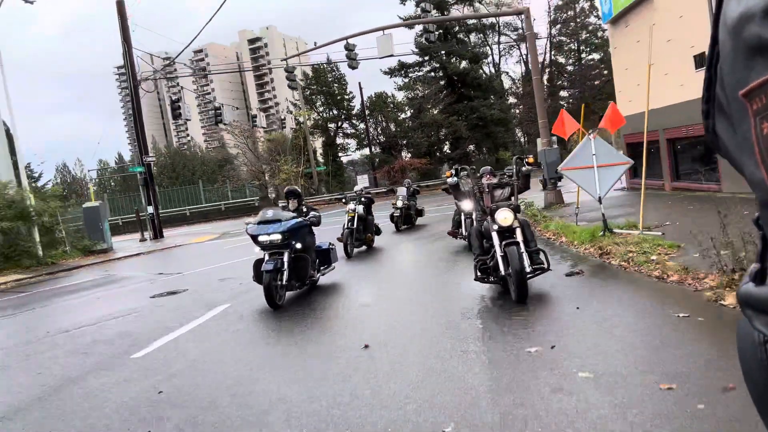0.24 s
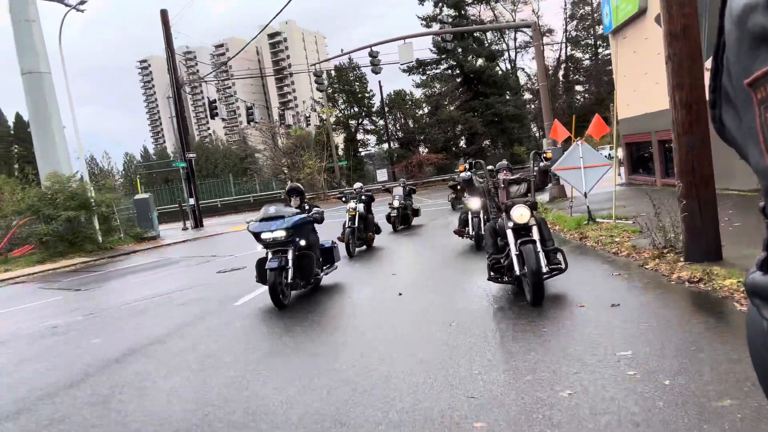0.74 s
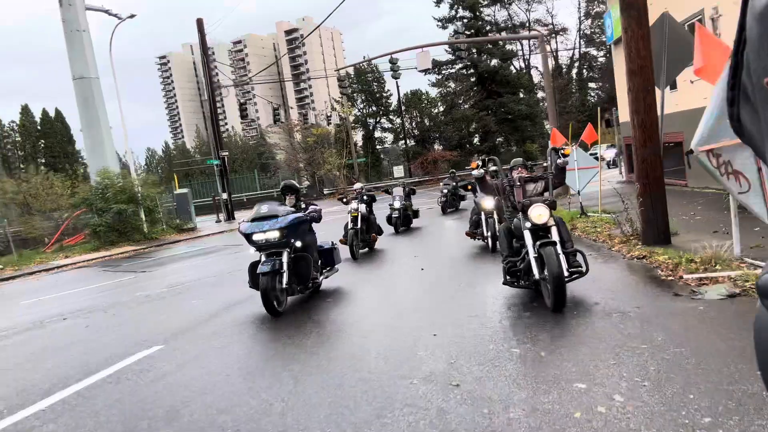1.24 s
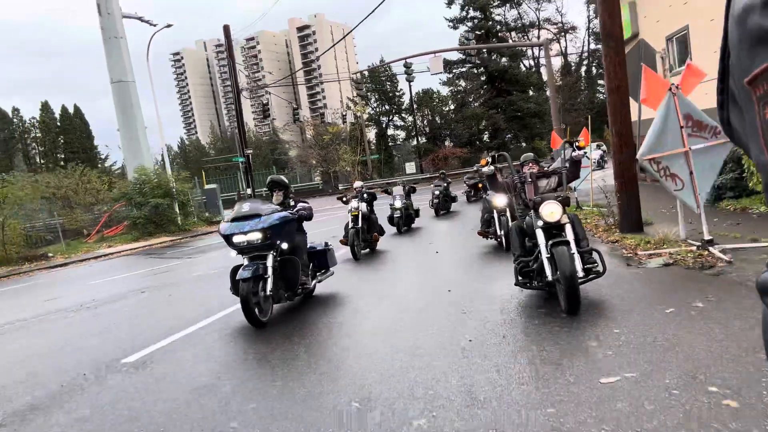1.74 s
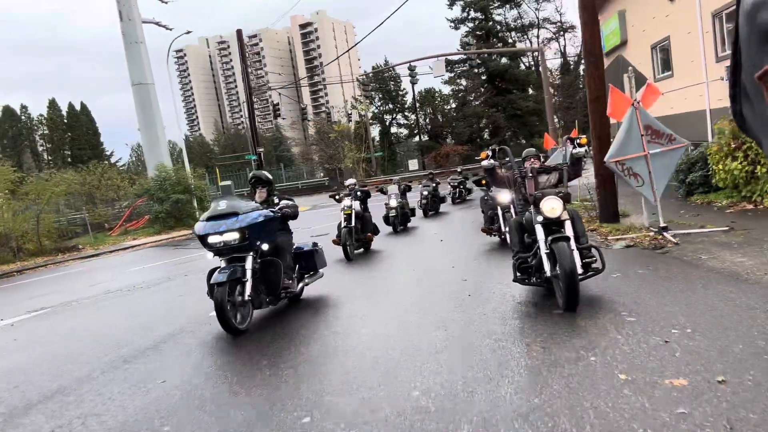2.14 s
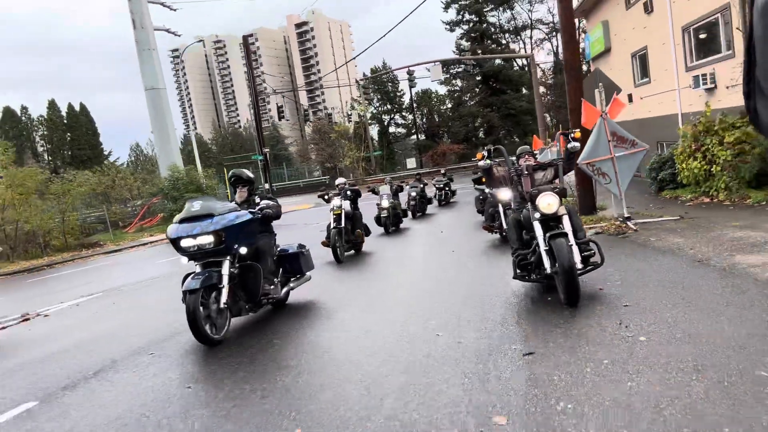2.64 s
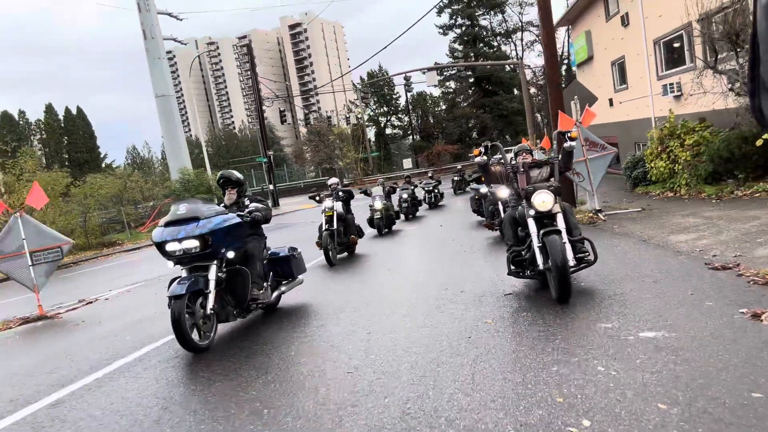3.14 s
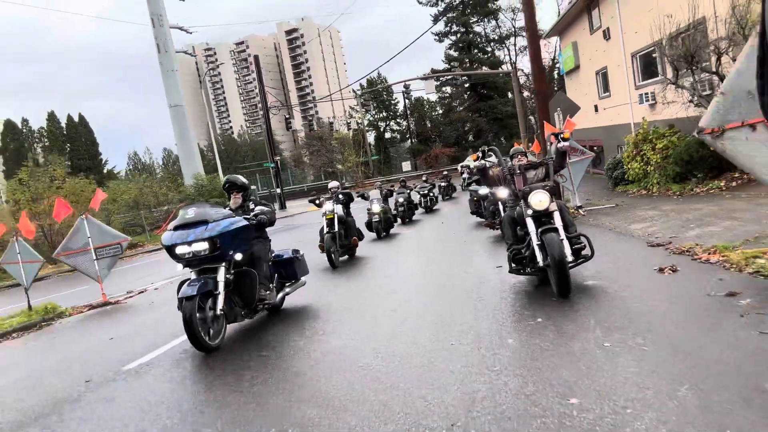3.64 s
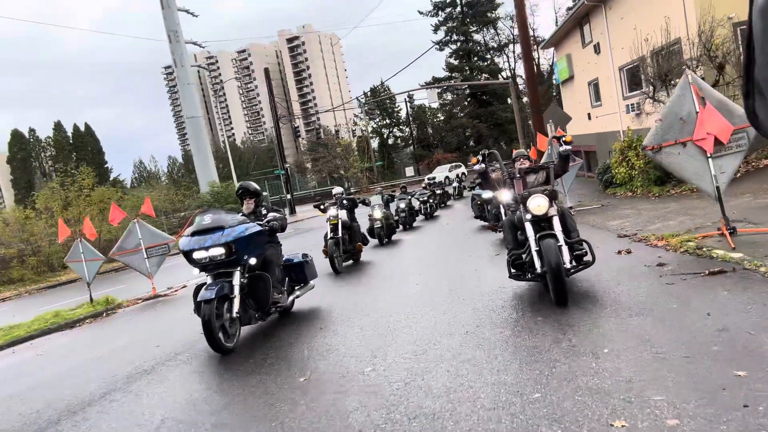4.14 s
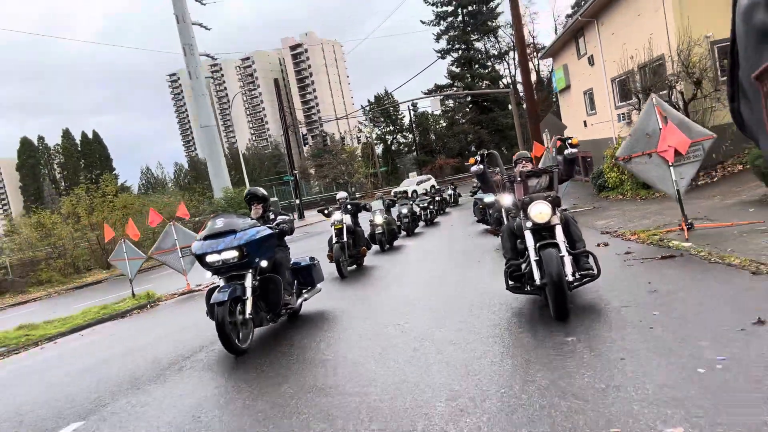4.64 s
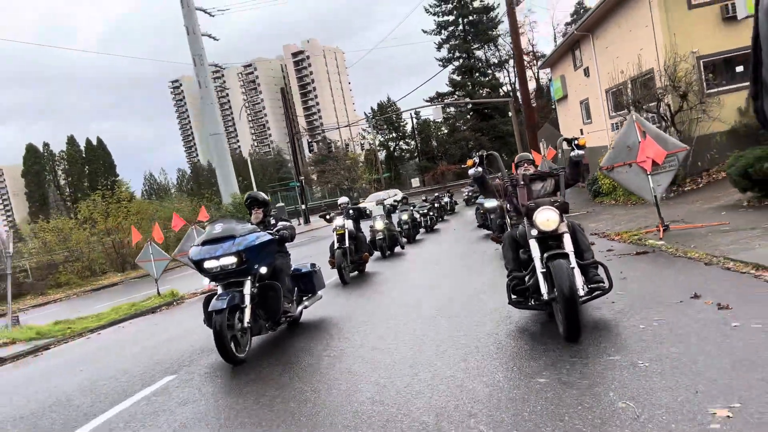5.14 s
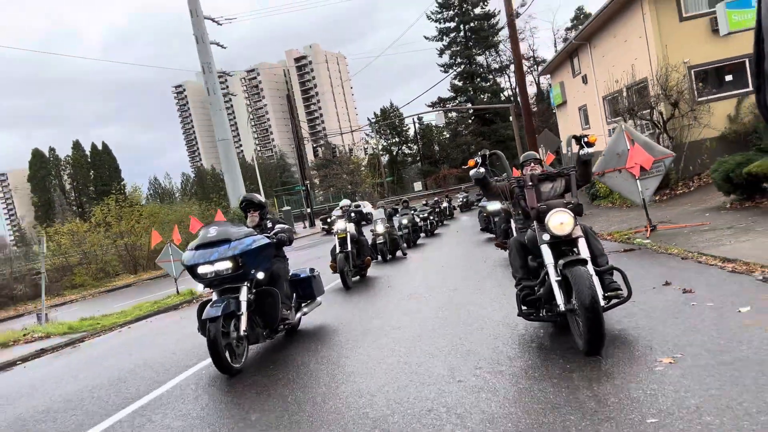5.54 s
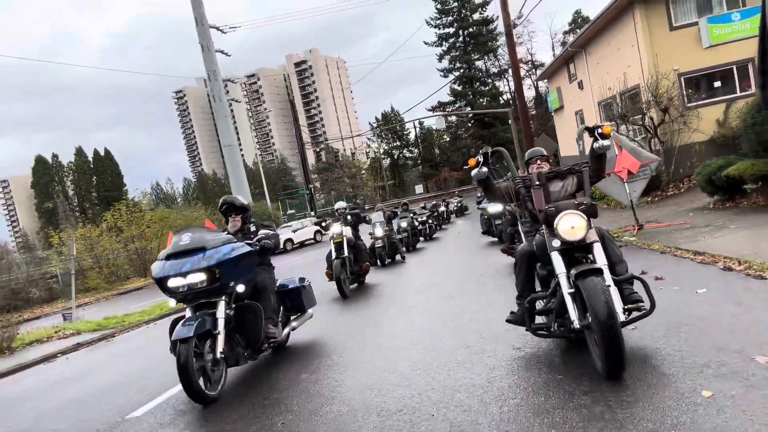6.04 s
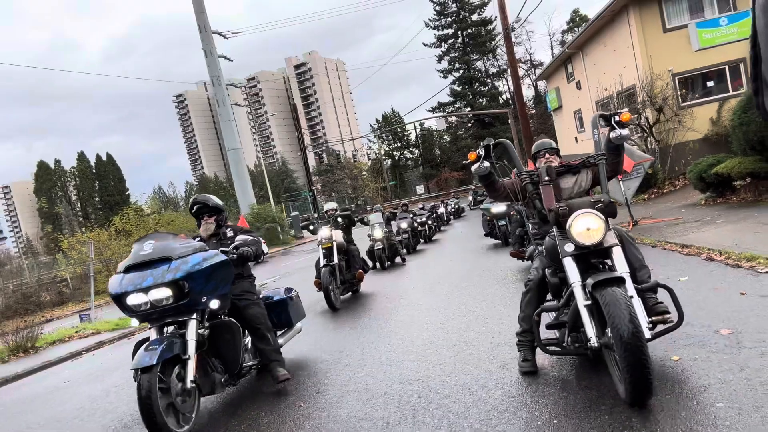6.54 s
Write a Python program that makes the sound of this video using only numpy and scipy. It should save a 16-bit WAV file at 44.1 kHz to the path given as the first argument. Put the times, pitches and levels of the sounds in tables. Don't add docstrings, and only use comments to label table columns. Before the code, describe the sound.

Many deep motorcycle exhausts lope and blur into one throbbing rumble while single riders crack their throttles, loudest as the group comes close.

```python
import sys
import numpy as np
from scipy import signal
from scipy.fft import rfft, irfft, next_fast_len
from scipy.io import wavfile
from scipy.ndimage import uniform_filter1d

SR = 44100
rng = np.random.default_rng(int(sys.argv[2]) if len(sys.argv) > 2 else 0)


def amp(db):
    return 10 ** (np.asarray(db, float) / 20)


def write(x):
    x = np.atleast_2d(x).T
    wavfile.write(sys.argv[1], SR, np.round(np.clip(x, -1, 1) * 32767).astype(np.int16))


N = 298998


def evened(x):
    return x / np.sqrt(np.mean(x ** 2) + 1e-20)


def read(points, hz):
    f, value = np.transpose(points)
    return np.interp(np.log(hz + 1), np.log(f + 1), value)


def band(x, lo_hz, hi_hz, order=2):
    return signal.sosfilt(signal.butter(order, [lo_hz, hi_hz], "band", fs=SR, output="sos"), x)


def coloured(x, points):
    gain_db = read(points, abs(np.fft.fftfreq(16384, 1 / SR)))
    log_gain = np.log(amp(np.maximum(gain_db, -100)))
    phase = -signal.hilbert(log_gain).imag
    taps = np.fft.ifft(np.exp(log_gain + 1j * phase)).real[:8192]
    return signal.oaconvolve(x, taps[None], axes=1)[:, :N]


def drift(rate_hz):
    t = np.arange(N // 64 + 2) * 64 / SR
    f = np.geomspace(.1, 1, 12) * rate_hz
    sines = np.sin(2 * np.pi * (f * t[:, None] + rng.random(12)))
    slow = evened((sines / np.sqrt(f)).sum(1))
    return np.interp(np.arange(N) / SR, t, slow)


def placed(x, lag_ms, pan_db):
    size = next_fast_len(len(x) + 64)
    delay = np.exp(-2j * np.pi * np.fft.rfftfreq(size, 1 / SR) * lag_ms / 1000)
    late = irfft(rfft(x, size) * delay, size)[:len(x)]
    return np.array([x * amp(pan_db / 2), late * amp(-pan_db / 2)])


def add(mix, s, sound):
    part = mix[:, max(round(s * SR), 0):][:, :sound.shape[1]]
    part += sound[:, :part.shape[1]]


def blow(x, ms):
    return x / np.sqrt(np.mean(x[..., :round(ms * SR / 1000)] ** 2))


def chirp(ms, start_hz, end_hz, swell_ms, dying_ms):
    glide_hz = end_hz + (start_hz - end_hz) * np.exp(-ms / swell_ms)
    swell = np.minimum(ms / swell_ms, 1) ** 2
    dying = np.exp(-np.maximum(ms - swell_ms, 0) / dying_ms)
    return np.sin(2 * np.pi * np.cumsum(glide_hz) / SR) * swell * dying


def hard_firing(crack_db, bark_db, snap_db, thump_db, pipe, fizz_db, jet_ms):
    thump_lag_ms, crack_lag_ms, pan_db, bark_hz, crack_hz, end_hz, swell_ms, rasp = pipe
    ms = np.arange(2600) * 1000 / SR
    jet = np.exp(np.minimum((ms - 2.) / .7, (2. - ms) / jet_ms))
    tail_levels = np.array([[0.16 * rasp], [.2 * rasp], [.006], [.006], [rasp]])
    tails = tail_levels * np.minimum(ms / 4.1, 1) * np.exp(-ms / 17.0)
    gusts = rng.standard_normal((5, len(ms))) * (jet + tails)
    edges_hz = [(crack_hz * 0.77, crack_hz * 1.27), (6600, 9500), (9600, 14600), (14600, 15900),
                (bark_hz * 0.6, bark_hz * 1.212)]
    crack, fizz, air, top, bark = (blow(band(gust, *edge, order=3), ms=6) for gust, edge in zip(gusts, edges_hz))
    crack = crack + amp(fizz_db) * (fizz + 0.18 * air + .08 * top)
    gas = amp(crack_db) * crack + amp(bark_db) * bark

    snap = -blow(chirp(ms, 1150, 620, 2.6, 2.), ms=7.5)
    thump = blow(chirp(ms, 620, end_hz, swell_ms, 4.), ms=10)
    push = -.6 * chirp(ms, 200, 150, 2.2, 22.0)
    wave = amp(snap_db) * snap + amp(thump_db) * (thump + push)
    return placed(gas, crack_lag_ms, pan_db) + placed(wave, thump_lag_ms, 0)


# (time [s], engine cycles [Hz])
REV = [(3.4271, 19.31), (3.52, 24.22), (3.62, 29.11), (3.7, 29.08), (3.76, 24.02), (3.82, 24.43),
       (4.1, 19.04), (4.38, 14.04)]
# (time [s], gas level [dB], thump level [dB])
THROTTLE = [(3.427, -40, -26.5), (3.456, -31, -25), (3.5, -31, -17), (3.599, -36, -18.5),
            (3.64, -21, -13.5), (3.69, -36.5, -20), (3.76, -50, -26.5), (3.83, -38, -41),
            (4.37, -49.5, -47)]


def long_rev():
    rear_turn, rear_gas_db, uneven_db = .42, -6.5, 1.5
    t = np.arange(REV[0][0], REV[-1][0], 1 / SR)
    turns = np.cumsum(np.interp(t, *np.transpose(REV))) / SR + rear_turn - 1
    whole = np.arange(np.floor(turns[-1]) + 1)
    s = np.interp(np.r_[whole, whole - 1 + rear_turn], turns, t)
    rear = np.repeat([0, 1], len(whole))
    at, gas_db, thump_db = np.transpose(THROTTLE)
    chance_db = uneven_db * rng.standard_normal((2, len(s)))
    gas = np.interp(s, at, gas_db) + rear_gas_db * rear + chance_db[0]
    thump = np.interp(s, at, thump_db) + chance_db[1]
    return np.c_[s, gas, thump]


# (time [s], gas level [dB], thump level [dB])
FIRST_BLIP = [(.6854, -45, -30.5), (.7044, -51, -41), (.7243, -34, -16), (.7497, -30, -19),
              (.7801, -37.5, -18), (.8011, -29.5, -14.5), (.8294, -50, -30), (.8994, -48.5, -18),
              (5.2294, -39.5, -46), (5.252, -43, -46)]
AHEAD_POPS = [(1.652, -37.5, -37), (1.6707, -43, -31), (1.6931, -37.5, -30.5), (1.709, -43, -30),
              (1.7296, -45, -27)]
SIDE_POPS = [(2.21, -36, -37), (2.2606, -32.5, -26.5), (4.6902, -44, -24), (5.6337, -40.5, -48),
             (5.7022, -28.5, -20.5), (5.7287, -30, -23)]
SHARP_BLIP = [(2.9801, -36.5, -19), (3.0024, -41.5, -23.5), (3.0101, -36, -16), (3.0294, -45, -28.5),
              (3.046, -26.5, -17.5), (3.0704, -32.5, -15.5), (3.1667, -38.5, -22), (3.1926, -39.5, -26)]
LAST_BURST = [(5.8687, -38, -27), (5.913, -32, -16), (5.9321, -35.5, -15), (5.9561, -28.5, -16),
              (5.9804, -32, -17.5), (5.9954, -35.5, -17), (6.1241, -34.5, -19.5), (6.1461, -29.5, -24.5),
              (6.1761, -30.5, -17), (6.1945, -30.5, -12), (6.2206, -35.5, -18.5), (6.5515, -31, -17),
              (6.5775, -38, -19.5), (6.6012, -33.5, -14), (6.6201, -33, -15.5), (6.6394, -37.5, -22.5),
              (6.7332, -42.5, -42)]
BEHIND_POPS = [(1.4208, -54, -47), (1.782, -38.5, -28), (1.896, -42.5, -35), (1.9401, -46, -32),
               (1.9785, -49, -29), (2.019, -50, -32), (4.055, -45.5, -29)]
# (thump lag right [ms], crack lag right [ms], crack left over right [dB],
# bark [Hz], crack [Hz], thump end [Hz], swell [ms], rasp after the bark [0-1])
PIPES = [
    (0.67, 0.4, 5, 1600, 2600, 151, 5.6, 0.12),
    (-0.18, -0.11, 6.5, 1840, 4700, 284, 3, 0.8),
    (0.87, 0.188, 4.5, 2130, 4000, 190, 5.5, 0.5),
    (0.4, 0.242, -4.5, 2200, 4270, 261, 3.2, 0.12),
    (0.39, 0.22, -11, 2110, 4000, 250, 3.9, 0.64),
    (-0.18, -0.083, 2, 1860, 5000, 284, 2.4, 0.2),
]
# (crack from gas [dB], bark from gas [dB],
# snap from the mean of gas and thump [dB], fizz from crack [dB], jet [ms])
VOICES = [(-4.5, -1.5, -3, -11, 2.6), (0, 0, 1, -5.5, 4.7), (-11, 2.5, -8.5, -9, 2.7),
          (-1.5, -6, -2.5, -6, 1.3), (-15, -1, -3.5, -10.5, 2.5), (-11, 0.5, 4.5, -7, 1.2)]


def throttle_blips():
    blips = np.zeros((2, N))
    tables = FIRST_BLIP, AHEAD_POPS, SIDE_POPS, [*SHARP_BLIP, *long_rev()], LAST_BURST, BEHIND_POPS
    for rows, pipe, (crack_db, bark_db, snap_db, fizz_db, jet_ms) in zip(tables, PIPES, VOICES):
        for s, gas_db, thump_db in rows:
            middle_db = (gas_db + thump_db) / 2
            fired = hard_firing(gas_db + crack_db, gas_db + bark_db, middle_db + snap_db, thump_db,
                                pipe, fizz_db, jet_ms)
            add(blips, s - .001, fired)
    return blips


# (time [s], pitch [Hz], level [dB])
PULL = [(2.15, 166.7, -46), (2.302, 161.4, -42), (2.364, 157.2, -17.5), (2.434, 157.8, -25),
        (2.954, 165.8, -28.5), (3.052, 164.7, -36), (3.212, 175.6, -18), (3.29, 162, -39),
        (3.3, 163.4, -27)]


def pulling_engine():
    s, hz, db = np.transpose(PULL)
    t = np.arange(s[0], s[-1], 1 / SR)
    tone = np.sqrt(2) * np.sin(2 * np.pi * np.cumsum(np.interp(t, s, hz)) / SR)
    fade = signal.windows.tukey(len(t), .2)
    return s[0], placed(amp(np.interp(t, s, db)) * tone * fade, 0.1, 0)


def firings(cycle_hz, wander, uneven_db):
    turns = np.cumsum(cycle_hz * (1 + wander * drift(1.5))) / SR + rng.random()
    front = np.diff(np.floor(turns), prepend=0) > 0
    rear = np.diff(np.floor(turns + 315 / 720), prepend=0) > 0
    return (front + 0.89 * rear) * amp(uneven_db * rng.standard_normal(N))


def loping_engines(count=12):
    pulses, puffs = np.zeros((2, N)), np.zeros((2, N))
    for cycle_hz in np.geomspace(8.5, 19., count):
        fired = firings(cycle_hz, wander=.09, uneven_db=3.5)
        echo, size, lag_ms = rng.uniform([150, .4, -.15], [400, 1.3, .65])
        piped = signal.lfilter([1], np.r_[1, np.zeros(int(echo)), .3], fired)
        pulses += size * placed(piped, lag_ms, 0)
        gate = signal.lfilter([1], [1, -np.exp(-1 / (0.0034 * SR))], fired)
        puffs += size * placed(gate * rng.standard_normal(N), lag_ms, 0)
    return pulses, puffs


def resonate(x, hz, width_hz):
    turn = np.exp(2j * np.pi * np.cumsum(hz) / SR)
    r = np.exp(-np.pi * width_hz / SR)
    return 2 * (turn * signal.lfilter([1 - r], [1, -r], x / turn)).real


# (time [s], level [dB], load that opens rasp and hiss [dB])
COLUMN = [(0.0, -20.5, 5), (0.1, -18.5, -2.5), (0.6, -22.5, 0), (0.85, -17.5, -0.5), (1.3, -19, 1.5),
          (1.6, -19, 4), (2.05, -19.5, 6.5), (2.3, -18, 0.5), (2.8, -18.5, 0), (3.3, -18.5, 0.5),
          (3.75, -22.5, 4), (4.1, -19, 0), (4.4, -18.5, -0.5), (4.65, -19.5, 3), (5.0, -18, -1),
          (5.5, -17, 3), (5.9, -15, 3), (6.78, -14.5, 1.5)]
# (time [s], depth [dB])
LULLS = [(.3, 6), (.55, 8), (.92, 5), (1.0, 2.5), (1.49, 4), (1.58, 5), (1.82, 13), (2.17, 9), (2.59, 8),
         (2.848, 6), (2.96, -1.5), (3.06, 3), (3.74, 8), (4.0, 4), (4.17, 6.5), (4.38, 5), (4.72, 8),
         (5.04, 10.5), (5.18, 4), (5.65, 7.5), (5.83, 3), (6.06, 5.5), (6.72, 2)]
# (time [s], pitch [Hz])
BOOM = [(0.0, 84), (.17, 78), (0.3, 57.6), (0.58, 70), (1.15, 80.2), (1.5, 63.7), (1.87, 84), (2.02, 63.6),
        (2.8, 67.8), (3.0, 77), (3.3, 69), (3.49, 78.6), (3.7, 56.2), (3.9, 69), (5.25, 68.3), (5.5, 81.4),
        (5.85, 62.6), (6.05, 85)]
# (frequency [Hz], density [dB per Hz])
EXHAUST = [(18, -65), (30, -32.5), (38, -13.5), (46, -3), (59, -6), (118, -3.5), (223, -11.5), (288, -17.5),
           (550, -30), (649, -31.5), (1100, -33), (1430, -59), (2420, -120)]
HISS = [(530, -13), (900, -7.5), (1100, -8), (1440, -6), (1720, -10), (1930, -7.5), (2500, -12.5),
        (2810, -13), (3070, -16), (5260, -19.5), (6150, -23), (8100, -19), (8930, -23), (9380, -25.5),
        (12200, -55), (20600, -120)]
AIR = [(9900, -44.5), (10600, -51), (11600, -35), (12800, -42), (13600, -37.5), (14200, -58.5),
       (15000, -55.5), (15700, -40), (16100, -91.5)]
# (offset from the level [dB], share of level change, share of load,
# level under a blip's pressure [dB])
LAYERS = [
    (1.5, 0.98, -0.049, -8),
    (-2, 0.99, 0.12, -2.5),
    (-15.5, 0.43, 0.89, -21),
    (-26.5, 0.47, 0.52, -31),
]


def column(pressure):
    pulses, puffs = loping_engines()
    spread = band(rng.standard_normal((2, N)), 425, 1300)
    far = placed(rng.standard_normal(N), 0.14, 0) + 1.68 * spread
    exhaust = coloured(evened(pulses) + .5 * far, EXHAUST)
    common = placed(rng.standard_normal(N), .24, 0)
    wash = 1.52 * evened(puffs) + 1.94 * rng.standard_normal((2, N)) + common
    hiss = coloured(wash, list(HISS[:-2]) + list(AIR))

    t = np.arange(N) / SR
    throb = band(exhaust, 51.6, 112.8)
    boom = resonate(throb, np.interp(t, *np.transpose(BOOM)), 27.0)
    throb = evened(throb) + 2.9 * evened(boom)
    layers = throb, band(exhaust, 141, 357.6), band(exhaust, 274.7, 802), hiss

    at, level_db, load_db = np.transpose(COLUMN)
    level_db, load_db = np.interp(t, at, level_db), np.interp(t, at, load_db)
    coarse, lull_s = t[::64], 0.027
    dips_db = sum(db * np.exp(-((coarse - s) / lull_s) ** 2) for s, db in LULLS)
    lull_db = np.interp(t, coarse, dips_db)

    mean_db = -19
    lull_shares = 1, 0.34, 0, 0
    flutter = amp(drift(14))
    flutters = 1, 1, 1, flutter
    steady_spans = 2200, 3500, 5000, 6000
    mix = np.zeros((2, N))
    for x, (db, near, load, blip_db), dip, gust, span in zip(layers, LAYERS, lull_shares, flutters, steady_spans):
        rolling_db = mean_db + db + near * (level_db - mean_db) + load * load_db - dip * lull_db
        gain = amp(rolling_db) + amp(blip_db) * pressure
        steadied = x / np.sqrt(uniform_filter1d((x ** 2).mean(0), span) + 1e-12)
        mix += gain * gust * steadied
    return mix


# (frequency [Hz], time to fall 60 dB [s])
STREET = [(100, .3), (500, .22), (2000, .14), (8000, .08)]


def street(x):
    taps = np.zeros((2, SR // 2))
    slots = np.arange(500, SR // 2 - 20, 20)
    at = slots + rng.integers(0, 20, (2, len(slots)))
    np.put_along_axis(taps, at, rng.choice([-1., 1.], at.shape), 1)
    hz, t, z = signal.stft(taps, SR, nperseg=256)
    same = np.clip(250 / (hz[:, None] + 1), 0, 1)
    z[1] = same * z[0] + np.sqrt(1 - same ** 2) * z[1]
    decay = amp(-60 * t / read(STREET, hz)[:, None])
    tail = signal.istft(z * decay, SR, nperseg=256)[1]
    return signal.fftconvolve(x[None], tail / np.linalg.norm(tail[0]), axes=1)[:, :N]


def scene():
    mix = throttle_blips()
    power = uniform_filter1d((mix ** 2).mean(0), round(.05 * SR))
    pressure = np.sqrt(abs(power))
    mix += amp(-15.5) * street(mix.mean(0))
    add(mix, *pulling_engine())
    return mix + column(pressure)


def top_cut(x):
    return signal.sosfilt(signal.butter(12, 15980, fs=SR, output="sos"), x)


def record(dry):
    mix = 1.4 * np.tanh(dry / 1.4)
    return top_cut(mix)


dry = scene()
out = record(dry)
write(out)
```